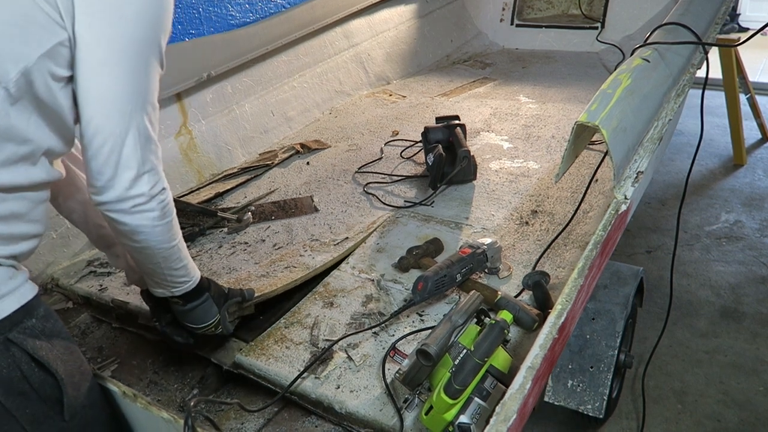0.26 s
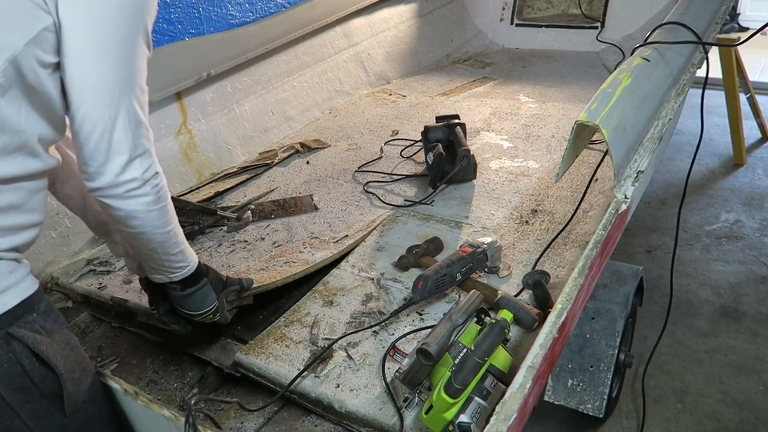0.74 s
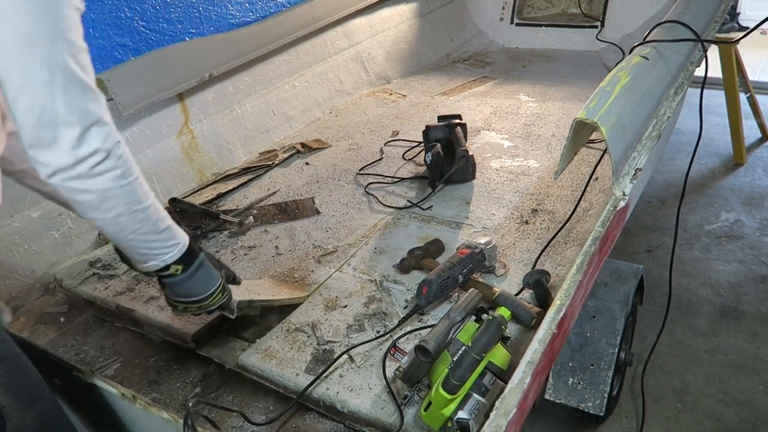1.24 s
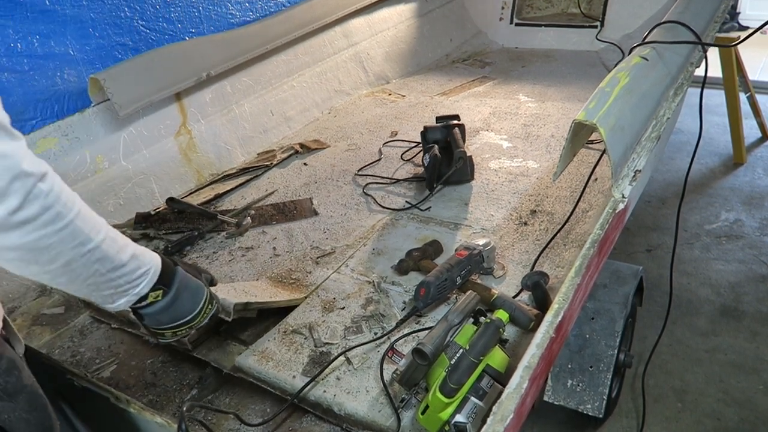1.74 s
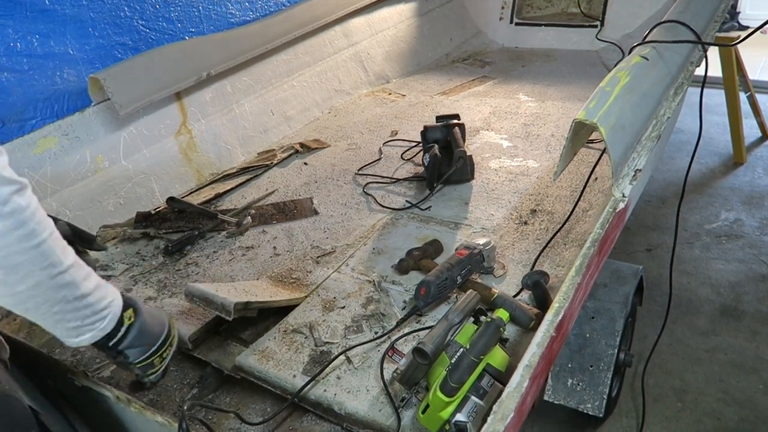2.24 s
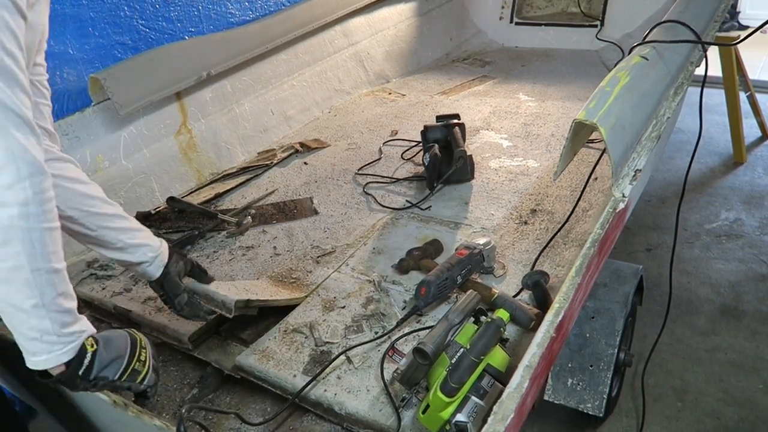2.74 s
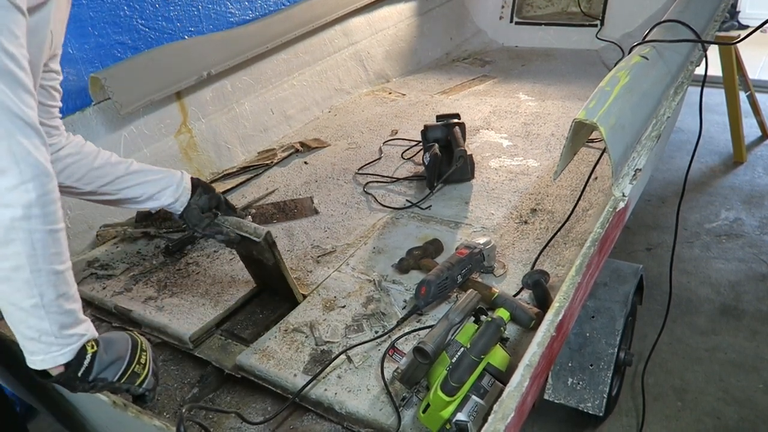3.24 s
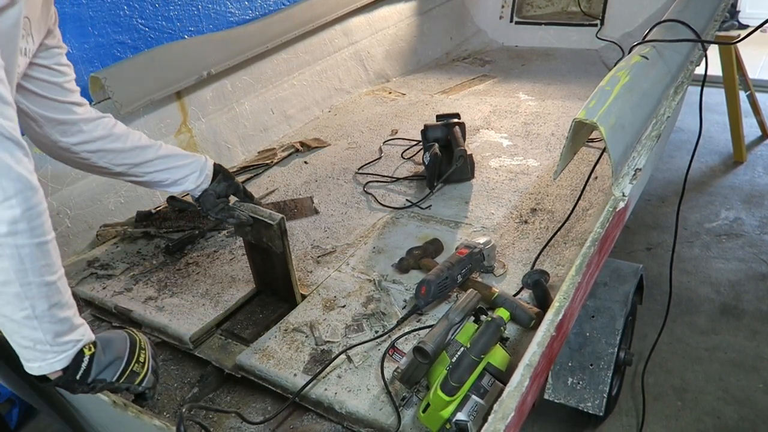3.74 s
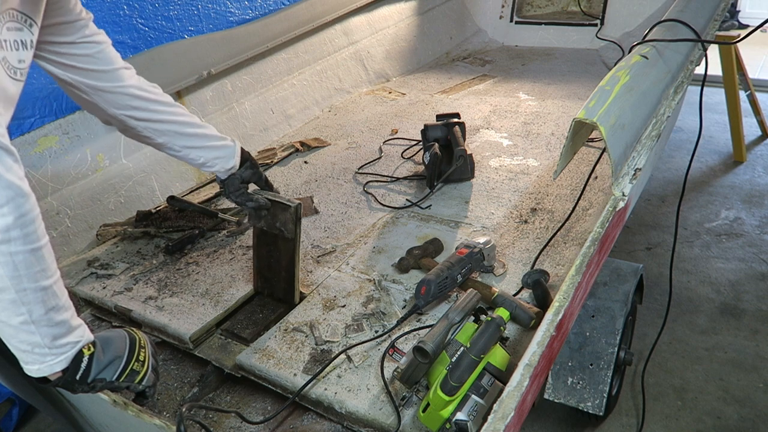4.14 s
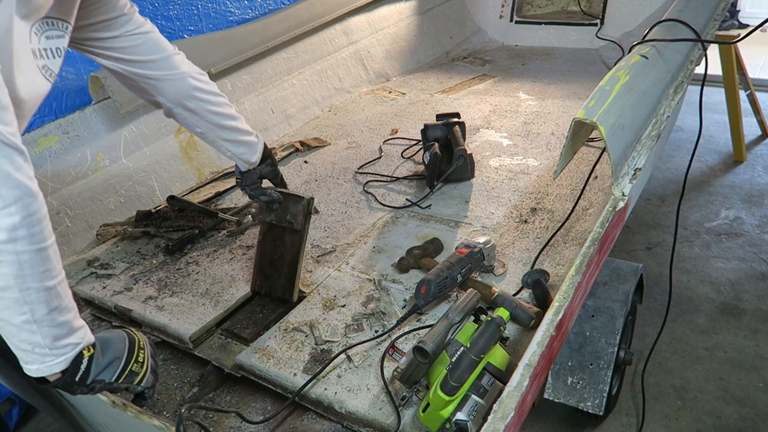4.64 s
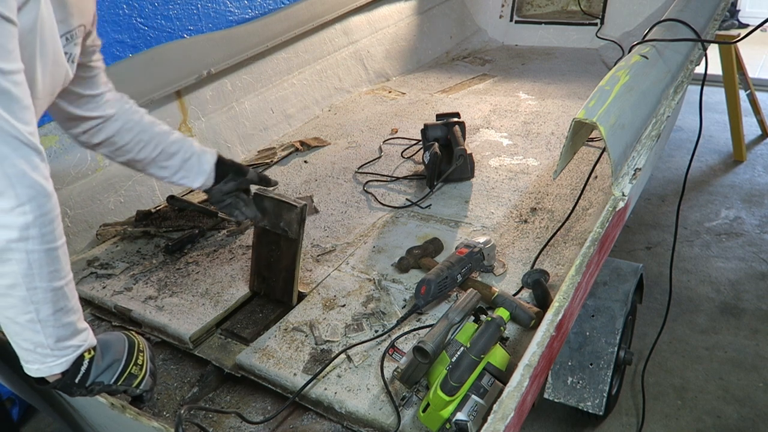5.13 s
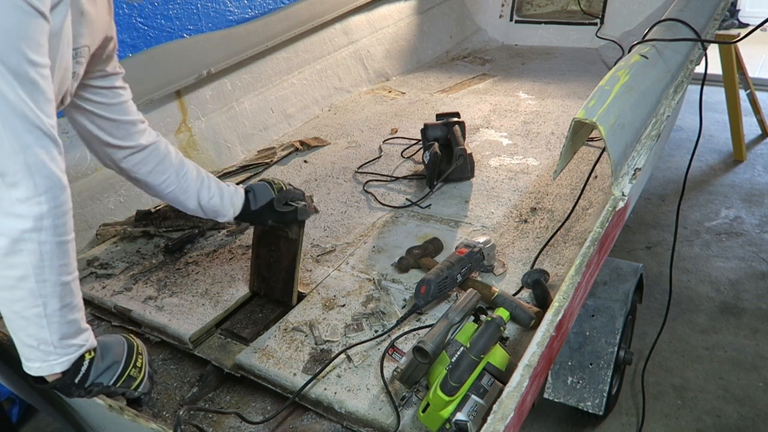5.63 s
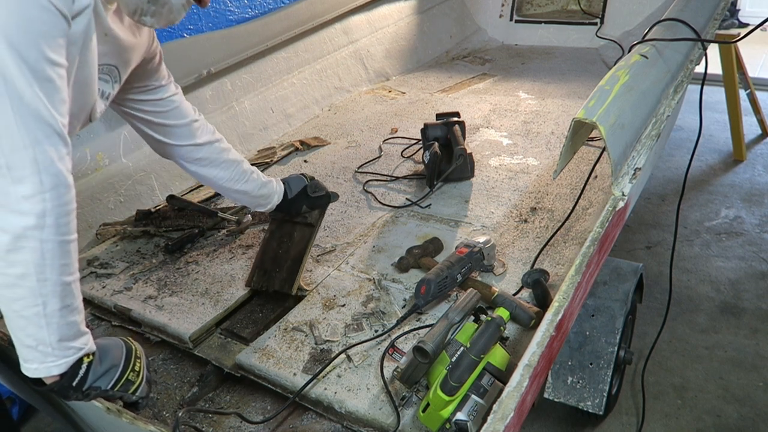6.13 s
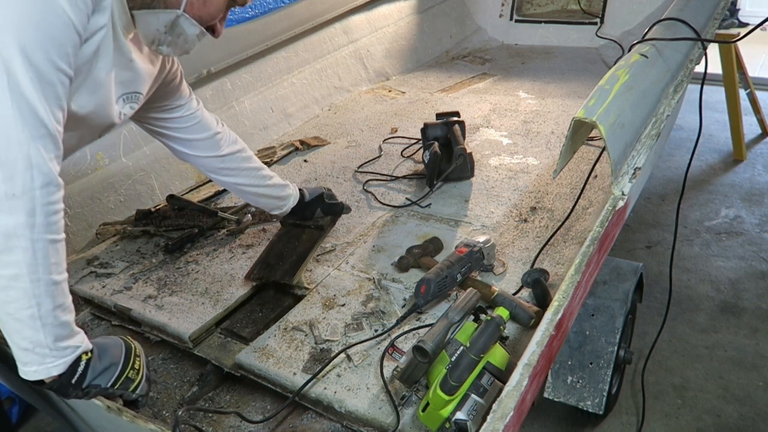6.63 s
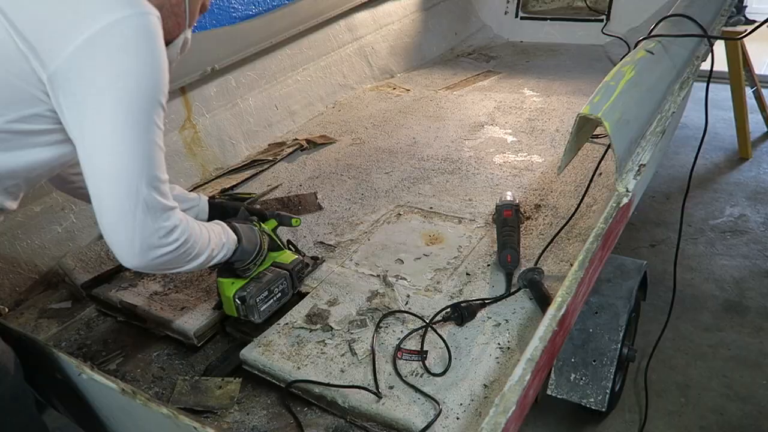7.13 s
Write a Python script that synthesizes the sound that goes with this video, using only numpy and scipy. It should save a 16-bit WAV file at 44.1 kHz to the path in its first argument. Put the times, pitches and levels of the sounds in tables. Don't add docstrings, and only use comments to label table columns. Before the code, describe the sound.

Close stereo pickup of old wood being prised up: a violent first burst of about a second, overloading at the hardest breaks, then near silence with low hum and soft glove brushes. Crackling resumes with knocks, squeaks and groaning wood, turns thinner and drier for the last strip, and cuts suddenly to a rumbling motor starting up.

```python
import sys
import numpy as np
from scipy import signal
from scipy.fft import rfft, irfft, next_fast_len
from scipy.io import wavfile
from scipy.ndimage import uniform_filter1d, map_coordinates

SR = 44100
rng = np.random.default_rng(int(sys.argv[2]) if len(sys.argv) > 2 else 0)


def ratio_of_db(decibels):
    return 10 ** (np.asarray(decibels, float) / 20)


def put_to_file(sound):
    columns = np.atleast_2d(sound).T
    safe = np.clip(columns, -1, 1)
    whole_steps = np.round(safe * 32767)
    wavfile.write(sys.argv[1], SR, whole_steps.astype(np.int16))


N = 325458
T = np.arange(N) / SR

FIRST_PULL_END_S, GRIP_S, LAST_PULL_S, SCENE_CHANGE_S = 2, 3.069, 5.9, 7.187

# start in seconds, hold in ms, strain in dB, swell in ms, fine dust over crackle in dB.
RIPS_BOARD = [
    (.203, 33, -22, 83, -8),
    (.47, 150, -28.5, 54, -7),
    (.623, 120, -26.5, 6, -12.5),
    (.86, 5, -21.5, 31, -12),
    (.91, 5, -13.5, 30, -18.5),
    (.974, 5, -18, 35, -28),
]
RIPS_PLANK = [(3.094, 110, -29.5, 12, -7), (3.274, 28, -26.5, 6, -5), (3.38, 190, -38.5, 50, -2),
              (3.688, 25, -30, 10, -6), (3.77, 190, -31.5, 60, -4.5), (3.98, 103, -21.5, 110, -6.5),
              (4.143, 28, -23, 12, -2), (4.416, 21, -24, 1700, -3), (4.621, 18, -27.5, 2600, -3.5),
              (4.733, 140, -26.5, 110, -3), (4.886, 25, -17.5, 120, -4), (4.931, 110, -25.5, 30, -6),
              (5.176, 75, -21, 16, -12), (5.25, 35, -26, 210, -4.5)]
RIPS_STRIP = [
    (5.5, 360, -51.5, 50, -4.5),
    (5.972, 30, -27.5, 107, -12),
    (6.024, 51, -23, 76, -3.5),
    (6.247, 8.5, -19.5, 350, -3),
    (6.352, 18, -26.5, 140, 4.5),
    (6.431, 6.9, -20.5, 5, -4),
    (6.684, 155, -37, 110, -0.5),
    (6.845, 6.2, -19.5, 8, -2.5),
    (6.905, 160, -31, 50, -1),
    (7.087, 80, -26, 50, -6.5),
]
# start in seconds, hold in ms, level in dB, swell in ms.
GROANS = [(0, 26, -51.5, 10), (0.211, 51, -24, 96), (.32, 12, -13.5, 10), (.61, 11.5, -29.5, 620),
          (.623, 4.4, -16.5, 5.7), (.86, 8.3, -15, 15), (.91, 5, -14, 34), (.974, 5, -16.5, 20),
          (1.4, 220, -50.5, 490), (3.132, 98, -32, 86), (3.275, 150, -29.5, 10), (3.698, 260, -32.5, 170),
          (3.982, 98, -15.5, 31), (4.152, 37, -21, 60), (4.416, 31, -20.5, 1300), (4.622, 17, -20.5, 290),
          (4.844, 130, -22, 290), (5.175, 85, -23.5, 12), (5.864, 60, -39, 610), (5.972, 5.3, -27.5, 130),
          (6.024, 43, -25, 65), (6.248, 91, -24, 620), (6.46, 16, -23, 60), (6.684, 9.6, -33.5, 22),
          (6.861, 43, -26, 36), (7.087, 6.8, -27, 46)]
# start in seconds, hold in ms, level in dB, swell in ms.
BOOMS = [(0, 150, -43, 11), (.296, 30, -25.5, 170), (.424, 20, -21.5, 240), (.62, 30, -35.5, 600),
         (.91, 60, -28, 85), (1.006, 55, -22.5, 145), (3.1, 170, -53, 21.2), (3.38, 60, -38, 490),
         (4.152, 20, -48, 430), (4.25, 550, -40.5, 200), (4.886, 230, -41, 150), (5.262, 37, -34.5, 170),
         (5.99, 44, -31, 480), (6.2, 350, -43, 50), (6.9, 280, -59, 300)]
# start in seconds, hold in ms, level in dB, swell in ms.
RUSTLES = [
    (2.158, 40, -64, 170),
    (2.682, 40, -63, 200),
    (2.8, 250, -72, 100),
    (3.076, 15, -46, 12),
    (1.56, 30, -66, 200),
]
SAG_DB_S, SWELL_DB = 14, 27
# first drop in dB, at dB per s, then dB per s.
FIBRE_RELEASE, WOOD_RELEASE = (7.6, 250, 86), (45, 230, 120)
HULL_RELEASE, CLOTH_RELEASE = (13, 180, 32), (18, 240, 150)

# start in seconds, peak in dB, splinter ring in dB, fine dust in dB, pitch in Hz.
SNAPS_BOARD = [(0.1302, -24, -16, -11, 2190), (0.146, -22.5, -4, -9.5, 2397),
               (0.2003, -5.5, -3.5, -13.5, 2565), (0.314, -16.5, 2, -33, 1050),
               (0.3267, -16, 2.5, -33.5, 1248), (0.4428, -17.5, -8, -12, 1648),
               (0.4548, -6.5, -3.5, -33.5, 1508), (0.486, -15, -3, -16.5, 1254),
               (0.5166, -16, -5, -9, 1667), (0.6212, 17, -23.5, -29, 1750),
               (0.843, -18.5, -2.5, -9.5, 2390), (0.851, -8.5, -3, -17.5, 1676),
               (0.9042, -5.5, -8.5, -18, 3150), (0.9606, -3, -7, -16, 3140), (0.9705, 16, -30, -31, 2496),
               (1.193, -32, 4.5, -24, 1243), (1.7243, -52.5, -11, -12.5, 1875),
               (1.8805, -52.5, -14, -16.5, 2630)]
SNAPS_PLANK = [
    (3.0716, -39.5, -17, -19.5, 1880),
    (3.0927, -20, -7, -14.5, 3040),
    (3.1574, -19, -20, -28.5, 1730),
    (3.2748, -30, -22, -22.5, 5870),
    (3.3503, -27.5, 5, -4, 2640),
    (3.4561, -19.5, -13, -29.5, 1770),
    (3.5365, -18.5, -33, -12.5, 2477),
    (3.6385, -25.5, -4, -7.5, 1390),
    (3.688, -22, 4.5, -11, 4064),
    (3.798, -17.5, -6, -13, 1405),
               (3.973, -10, -6, -15, 2360), (4.018, -11.5, 0, -4.5, 3300),
                (4.0665, -11.5, -1.5, -14, 3600), (4.139, -14.5, 0, -3, 1660),
                (4.2462, -18, -15.5, -5.5, 2660), (4.308, -4.5, -6, -14.5, 2750),
                (4.399, -9, -21, -4.5, 2153), (4.7077, -22, -22, 0.2, 2400), (4.7548, -14, -10, -14, 1504),
                (4.8785, -8.5, 0.5, -7.5, 2780), (4.8996, -12.5, -14.5, -8, 2920),
                (5.173, -5, -5, -20.5, 4470), (5.1993, 1.5, -24.5, -27.5, 2815),
                (5.2468, -14, -2, -18, 2090)]
SNAPS_STRIP = [(5.573, -46.5, 6, -0.5, 4900), (5.7106, -25, -19, -18.5, 1910),
               (5.881, -39.5, 1, -3.5, 1380), (5.9323, -32, 9, -27, 1390), (5.9577, -19.5, 0.5, -11, 2940),
               (6.021, -13.5, -1, -10.5, 1904), (6.06, -15, -7, -8, 2252), (6.1811, -16.5, -15, 0.5, 5700),
               (6.2399, -7, 0.5, -15.5, 2033), (6.341, -13.5, 7, 1.5, 5600), (6.4314, 3.5, 0, -14.5, 2090),
               (6.447, -11.5, 4, -20, 2913), (6.6557, -26.5, -1, -9, 1820), (6.699, -27, -19, -2, 3290),
               (6.844, -17, 11.5, 1, 2823), (6.9653, -22.5, -1, -1, 2880), (7.08, -17.5, 4, 4.5, 2090),
               (7.1305, -12.5, 4, -2.5, 2090)]
VOLLEY_S = 0.091
CLEAN_DB, CLEAN_SHORTENS = -13, 0.28

# start in seconds, peak in dB, t60 in ms.
THUDS = [
    (0.317, -11, 97),
    (0.326, -6, 70),
    (3.976, -14.5, 120),
    (4.147, -17.5, 210),
    (4.312, -9, 210),
    (5.961, -21, 130),
]

# start in seconds, length in ms, level in dB, pitch in Hz, width in Hz.
SQUEAKS = [(0.317, 36, -37, 1870, 1090), (.455, 34, -24.5, 1320, 509.5), (.457, 35, -32, 2284, 890),
           (0.511, 30, -32, 1609, 400), (0.501, 110, -40, 3863, 1193), (.853, 27, -32.5, 2937, 300),
           (0.903, 30, -26, 2940, 250), (.972, 16, -14, 2796, 912), (2.119, 146, -73, 2500, 701.6),
           (2.81, 21, -72.5, 3600, 200), (2.815, 25, -71, 1800, 201.3), (3.275, 90, -38.5, 970, 252),
           (3.3, 300, -45, 674, 79.4), (3.535, 55, -40, 3800, 1500), (3.537, 47, -40, 790, 400),
           (3.685, 37, -37, 3660, 500), (3.69, 220, -40, 671, 122), (3.772, 36, -38, 1500, 900),
           (4.031, 130, -33, 3257, 400), (4.313, 50, -29, 2520, 500), (4.375, 74, -27.5, 2050, 402),
           (4.545, 58, -31, 1960, 900), (4.61, 43, -35, 2470, 910), (4.759, 35, -31, 1490, 300),
           (4.88, 66, -29.5, 2773, 350), (4.882, 40, -25.5, 4420, 900), (5.176, 150, -36, 3776, 500),
           (5.715, 43, -50, 1760, 200), (6.152, 126, -31, 1950, 510), (6.182, 63, -39.5, 5610, 400),
           (6.31, 30, -32.5, 3325, 500), (6.341, 50, -27, 5580, 348), (6.432, 60, -25.5, 2807, 600),
           (6.44, 160, -35.5, 2307, 300), (6.6, 70, -55.5, 2200, 200), (6.795, 55, -44, 3230, 600),
           (6.845, 50, -30, 5070, 700), (6.98, 30, -33.5, 3160, 302), (7.082, 90, -39, 4317, 200.4),
           (7.083, 93, -29.5, 2090, 130)]
# start in seconds, length in ms, level in dB, pitch in Hz, width in Hz.
RUMBLES = [(0.201, 140, -36, 140.7, 110), (0.327, 68, -21.5, 248.2, 110), (0.339, 140, -33, 139.2, 71),
           (.558, 83, -30, 240.7, 140), (.865, 40, -32.5, 244, 89), (.972, 14.3, -6.5, 556, 330),
           (1.0, 18, -25.5, 328, 230), (1.039, 6.7, -17.5, 230, 200), (1.05, 64, -27, 301.4, 160),
           (1.13, 23, -33, 202.7, 110), (1.2, 63, -34.5, 176, 310), (4.53, 57, -35.5, 393, 240),
           (4.61, 76, -39.5, 397, 160), (5.198, 37, -20.5, 372, 140), (5.245, 14, -24, 381.4, 160),
           (5.27, 73, -36.5, 375, 190), (6.67, 29, -40, 600, 500), (0.625, 21, -22, 399.7, 170),
           (5.9, 55, -34, 217, 74), (5.95, 49, -27, 65, 7.9), (5.95, 30, -34.5, 402, 50),
           (5.96, 61, -34, 172.4, 18), (6.05, 60, -30, 245, 67), (6.17, 42, -32, 216.6, 57),
           (7.19, 60, -34, 65, 30)]
# start in seconds, length in ms, level in dB, pitch in Hz, width in Hz.
SCRAPES = [
    (.971, 14, -21, 4300, 1100),
    (1.1, 25, -28.5, 2400, 1200),
    (5.198, 22, -23, 2900, 1900),
    (1.74, 100, -63.5, 230, 61),
    (.622, 12, -16.5, 3900, 1500),
    (2.83, 150, -64, 235, 110),
]
RUB_FADE_DB, RUB_EDGE_S = 12, 0.0048

# start in seconds, peak in dB.
TICKS = [(0.0002, -43), (0.6229, -7), (0.631, -4), (0.8438, -21), (0.9726, -5.5), (1.4662, -57),
         (1.494, -52), (1.6507, -64.5), (1.7244, -61.0), (2.3614, -71.0), (2.6782, -56.5), (3.4602, -27.5),
         (3.6655, -21), (3.7702, -20), (4.1426, -12), (4.401, -1.5), (4.7104, -20), (4.8796, -8.5),
         (5.0632, -20.5), (5.1754, -13.5), (5.1988, -5), (5.5749, -41), (5.7091, -35), (5.8292, -40),
         (5.8821, -43), (5.958, -20), (6.1827, -12), (6.3416, -7.0), (6.4333, -1.5), (6.6574, -28.5),
         (6.7008, -22), (6.8458, -10.5), (7.0802, -14), (7.1311, -7), (7.2212, -47.0), (7.3792, -42.0),
         (1.19, -43), (4.874, -16.5), (4.9006, -11.5), (6.2424, -13), (6.429, -14.5), (6.516, -30),
               (6.795, -33), (6.981, -21.5), (5.2037, -6)]
# start in seconds, peak in dB.
FLAKES = [(0.5852, -19.5), (3.2715, -22), (3.3348, -23), (3.3537, -18), (3.6835, -25.5), (3.7963, -18),
          (3.8494, -23), (3.8763, -25.5), (3.92, -21), (3.9594, -17.5), (4.8502, -16), (5.2246, -19.5),
          (7.0365, -19)]
TICK_T60_S, TICK_DB = .004, -4
CRUMBLE, CRUMBLE_T60_S = .35, .05

# frequency in Hz, level in dB per Hz.
CRACKLE = [(410, -26.5), (700, -5), (1000, 0), (2100, 0.5), (2850, 0.5), (3860, -4.5), (5580, -13),
           (7800, -28.5), (13200, -120)]
# frequency in Hz, level in dB per Hz.
DUST = [(2350, -16.5), (4000, -2), (6040, 2), (11800, -1.5), (13100, -4.5), (14000, -10.5), (15700, -20.5)]
# frequency in Hz, width in Hz, level in dB.
BOARD = [(191, 73, 2.5), (456, 140, 5), (887, 160, 1.5), (1620, 660, -17)]
# frequency in Hz, width in Hz, level in dB.
PLANK = [(166, 55, -3.5), (216.5, 23, 7.5), (252.6, 21, 8.5), (353.9, 30, 4.5), (402, 22, 8.5),
         (570, 62, 5), (730, 270, -7)]
# frequency in Hz, width in Hz, level in dB.
STRIP = [(2090, 120, -16), (2780, 79, 0.5), (5370, 340, -14.5)]
# frequency in Hz, width in Hz, amount taken away in dB.
HOLLOW = [(1150, 1300, -8)]
# frequency in Hz, width in Hz, level in dB.
HULL = [(47, 13, -10), (65, 19, -2), (116.3, 27, -4.5)]

# start in seconds, hold in ms, level in dB, swell in ms.
KICK = (7.2, 90, -33, 14)
# start in seconds, hold in ms, level in dB, swell in ms.
SPIN_UP = (7.332, 50, -38, 380)
# frequency in Hz, level in dB per Hz.
WHIRR = [(18, -37), (30, -17), (102, -15), (253, -32), (497, -17.5), (1000, -19), (1170, -17.5),
         (2130, -18.5), (11900, -48.5), (15000, -86.5)]

# frequency in Hz, level in dB rms.
HUM = [(53.8, -76), (100.2, -62), (200.2, -70), (608.3, -80.5), (2821, -91.5), (3505, -89), (7009, -95)]
HUM_WAVER_DB = 1.5
# frequency in Hz, level in dB per Hz.
AIR = [(15, -52), (25, -19), (45, -4), (90, -8.5), (140, -13.5), (208, -10.5), (569, -17.5), (7220, -42),
       (14000, -58.5)]
# time in seconds, level in dB.
ROOM_GAIN = [(0, -38), (.6, -44.5), (1, -50.5), (1.9, -62.5), (2.8, -56), (4.2, -50.5), (5.2, -52.5),
             (5.9, -41.5), (6.5, -56.5), (7.18, -48.5), (7.38, -37)]

# frequency in Hz, t60 in seconds.
SHOP = [(100, 1), (300, 0.48), (1000, 0.5), (3000, 0.24), (10000, 0.085)]
# frequency in Hz, t60 in seconds.
PORTS = [(100, .08), (1000, .04), (10000, 0.23)]
# frequency in Hz, side minus mid in dB.
WIDTH = [(60, -55), (170, -38), (300, -18), (1300, -15), (3300, -19), (4800, -10), (8100, -6), (15000, -3)]
# frequency in Hz, side minus mid in dB.
AIR_WIDTH = [(60, -50), (120, -34), (230, -12), (400, -3), (2400, -8), (8000, -2), (15000, 1)]
# frequency in Hz, lead in radians.
LEAD = [(4200, 0), (8400, .5), (11000, 1.1), (15000, 1.3)]


def unit(x):
    return x / np.sqrt(np.mean(x ** 2) + 1e-20)


def along(points, hz):
    f, v = np.transpose(points)
    return np.interp(np.log(hz + 1), np.log(f + 1), v)


def wobble(rate):
    coarse = T[::64]
    knots = rng.standard_normal(int(N * rate / SR) + 4)
    return np.interp(T, coarse, map_coordinates(knots, [coarse * rate]))


def filtered(x, response):
    m = next_fast_len(N + SR // 2)
    return irfft(rfft(x, m) * response(np.fft.rfftfreq(m, 1 / SR)), m)[..., :N]


def modes(table):
    def response(f):
        total = 0
        for k, (hz, width, db) in enumerate(table):
            damping = 1j * f * width
            total = total + (-1) ** k * ratio_of_db(db) * damping / (hz * hz - f * f + damping)
        return total
    return response


def colour(points):
    return lambda f: ratio_of_db(along(points, f))


def grit(spread_db, clump_db, clump_rate):
    sizes = np.minimum(rng.exponential(size=N), 6)
    return rng.standard_normal(N) * ratio_of_db(spread_db * sizes + clump_db * wobble(clump_rate))


def effort(s, hold_ms, db, swell_ms, release):
    drop_db, quick, slow = release
    hold, swell = hold_ms / 1000, swell_ms / 1000 + .001
    tired_db = db - SAG_DB_S * hold
    let_go_db = tired_db - drop_db
    times = np.cumsum([s - swell, swell, hold, drop_db / quick, 100 / slow])
    return np.interp(T[::64], times, [db - SWELL_DB, db, tired_db, let_go_db, let_go_db - 100], left=-150)


def efforts(rows, release):
    return np.array([effort(*row[:4], release) for row in rows])


def strongest(levels_db):
    return np.interp(T, T[::64], np.max(levels_db, axis=0))


def patchy(x, depth_db):
    z = signal.stft(x, nperseg=256)[2]
    field = uniform_filter1d(rng.standard_normal(z.shape), size=3, axis=0)
    field = uniform_filter1d(field, size=12, axis=1)
    return unit(signal.istft(z * ratio_of_db(depth_db * unit(field)), nperseg=256)[1][:N])


def wooden(x, board_db):
    board = filtered(x * (T < FIRST_PULL_END_S), modes(BOARD))
    plank = filtered(x * (T >= FIRST_PULL_END_S), modes(PLANK))
    return ratio_of_db(board_db) * board + plank


def ripping():
    rips = RIPS_BOARD + RIPS_PLANK + RIPS_STRIP
    strain_db = efforts(rips, FIBRE_RELEASE)
    crackle_db = strongest(strain_db)
    dust_db = strongest(strain_db + np.array(rips)[:, 4:])
    slips = unit(grit(spread_db=2.6, clump_db=2.8, clump_rate=50))
    powder = unit(grit(spread_db=2.6, clump_db=1.9, clump_rate=90))
    crackle = ratio_of_db(crackle_db - 3.5) * patchy(filtered(slips, colour(CRACKLE)), depth_db=3.2)
    dust = ratio_of_db(dust_db - 3.5) * unit(filtered(slips + powder, colour(DUST)))
    return crackle + dust


def groaning():
    level_db = strongest(efforts(GROANS, WOOD_RELEASE))
    creaks = grit(spread_db=3.4, clump_db=1.4, clump_rate=60)
    return ratio_of_db(level_db - 5.5) * unit(wooden(creaks, board_db=-0.5))


def booming():
    level_db = strongest(efforts(BOOMS, HULL_RELEASE))
    shifts = grit(spread_db=5.3, clump_db=0.6, clump_rate=31)
    return ratio_of_db(level_db - 6.0) * unit(filtered(shifts, lambda f: modes(HULL)(f) ** 2))


def rustling():
    level_db = strongest(efforts(RUSTLES, CLOTH_RELEASE))
    cloth = lambda f: colour(CRACKLE)(f) + ratio_of_db(-17.5) * colour(DUST)(f)
    return ratio_of_db(level_db) * unit(filtered(grit(spread_db=1.1, clump_db=1.3, clump_rate=60), cloth))


def tearing():
    regrip = np.clip((T - GRIP_S) / 0.023, 0, 1) ** 2
    gripped = np.maximum(T < FIRST_PULL_END_S, regrip)
    return (ripping() + groaning()) * gripped + booming() + rustling()


def snaps():
    crack, fine, knock = np.zeros((3, N + SR))
    t = np.arange(SR // 9) / SR
    treble_fade = 0.86 * ratio_of_db(-60 * t / .2) + .3 * ratio_of_db(-60 * t / 0.0019)
    for s, db, ring_db, fine_db, hz in SNAPS_BOARD + SNAPS_PLANK + SNAPS_STRIP:
        fibres = rng.standard_normal((2, len(t))) * ratio_of_db(2.3 * rng.exponential(size=len(t)))
        t60 = VOLLEY_S * ratio_of_db(-CLEAN_SHORTENS * max(db - CLEAN_DB, 0))
        fade = ratio_of_db(-60 * t / t60) * (1 - np.exp(-t / (0.008 * t60)))
        fade += 0.028 / np.sqrt(t60) * ratio_of_db(-60 * t / 0.0014)
        volley = fade * fibres
        loudness = np.sqrt(np.mean(volley ** 2, 1) / np.mean(fade ** 2))
        volley = ratio_of_db(db - 14.5) * volley / loudness[:, None]
        cycles = 14 * ratio_of_db(0.4 * ring_db)
        ring = ratio_of_db(-60 * t[:900] * hz / cycles) * np.sin(2 * np.pi * hz * t[:900])
        splinter = signal.oaconvolve(volley[0], ring / np.linalg.norm(ring))[:len(t)]
        here = slice(round(s * SR), round(s * SR) + len(t))
        crack[here] += volley[0] + ratio_of_db(ring_db) * splinter
        fine[here] += ratio_of_db(fine_db) * volley[1] * treble_fade
        knock[here] += volley[1]
    crack = ratio_of_db(6.5) * filtered(crack[:N], colour(CRACKLE))
    fine = ratio_of_db(19.0) * filtered(fine[:N], colour(DUST))
    return crack + fine + ratio_of_db(6.0) * wooden(knock[:N], board_db=-0.5)


def thuds():
    blows, t = np.zeros(N + SR), np.arange(SR // 4) / SR
    for s, db, t60_ms in THUDS:
        fade = ratio_of_db(-60000 * t / t60_ms) + 2.8 * ratio_of_db(-60 * t / 0.025)
        blows[round(s * SR):][:len(t)] += ratio_of_db(db) * fade * rng.standard_normal(len(t))
    return wooden(blows[:N], board_db=-1.0)


def rubbing():
    out = np.zeros(N + SR)
    t = T[:SR // 2]
    for s, length_ms, db, hz, width_hz in SQUEAKS + RUMBLES + SCRAPES:
        length = length_ms / 1000
        slips = rng.standard_normal(len(t)) * ratio_of_db(2.9 * rng.exponential(size=len(t)))
        edge = np.clip(np.minimum(t, length - t) / RUB_EDGE_S, 0, 1)
        rub = slips * edge * ratio_of_db(-RUB_FADE_DB * t / length)
        peak = signal.iirpeak(hz, hz / (1.5 * width_hz + 9), SR)
        ring = signal.lfilter(*peak, signal.lfilter(*peak, rub))
        out[round(s * SR):][:len(t)] += ratio_of_db(db) * ring / np.sqrt(np.sum(ring ** 2) / (length * SR))
    return out[:N]


def clicks(rows, t, crumbs):
    track = np.zeros(N + SR)
    fade = ratio_of_db(-60 * t / TICK_T60_S) + crumbs * ratio_of_db(-60 * t / CRUMBLE_T60_S)
    for s, db in rows:
        burst = fade * rng.standard_normal(len(t))
        burst *= ratio_of_db(db + TICK_DB) / np.sqrt(np.mean(burst[:30] ** 2))
        track[round((s - .0003) * SR) + 9:][:len(t)] += burst
    return track[:N]


def ticks():
    fibres = clicks(TICKS, T[:256], crumbs=0)
    flakes = clicks(FLAKES, T[:2048], crumbs=CRUMBLE)
    return filtered(fibres + flakes, colour(DUST)) + ratio_of_db(-1.0) * filtered(fibres, colour(CRACKLE))


def saw():
    rumble_db = strongest(efforts([KICK], HULL_RELEASE))
    whirr_db = strongest(efforts([SPIN_UP], HULL_RELEASE))
    motor = filtered(grit(spread_db=3.5, clump_db=-1.5, clump_rate=32), colour(WHIRR))
    rumble = filtered(motor, lambda f: 1 / (1 + (f / 400) ** 4))
    whirr = motor - rumble
    return (ratio_of_db(rumble_db) * unit(rumble) + ratio_of_db(whirr_db - 3.5) * unit(whirr)) * (T > SCENE_CHANGE_S)


def echoes(x, decay, hop, size):
    starts = range(0, N, hop)
    hz, t, z = signal.stft(rng.standard_normal((len(starts), size)), SR, nperseg=128)
    tails = signal.istft(z * ratio_of_db(-60 * t / along(decay, hz)[:, None]), SR, nperseg=128)[1]
    wet = np.zeros(N + 2 * SR)
    for start, tail in zip(starts, tails):
        answer = signal.fftconvolve(x[start:start + hop], tail / np.linalg.norm(tail))
        wet[start:][:len(answer)] += answer
    return wet[:N]


def background():
    lines = np.zeros(N)
    for hz, db in HUM:
        drift = 1 + 0.003 * wobble(2.4) + 0.004 * wobble(150)
        tone = np.sin(2 * np.pi * np.cumsum(hz * drift) / SR)
        sounding = (T < SCENE_CHANGE_S) | (hz < 1000)
        lines += ratio_of_db(db + 5.0 + HUM_WAVER_DB * wobble(33)) * tone * sounding
    air = unit(filtered(rng.standard_normal(N), colour(AIR)))
    air = ratio_of_db(-63.0 + 1.3 * wobble(10.0)) * air
    gain_db = np.interp(T, *np.transpose(ROOM_GAIN))
    return ratio_of_db(gain_db + 58.0) * (lines + air)


def scene():
    wood = tearing() + snaps() + thuds() + rubbing() + ticks()
    thin = lambda f: 1.4 * modes(STRIP)(f) - modes(HOLLOW)(f)
    wood = wood + filtered(wood * (T > LAST_PULL_S), thin)
    shop = np.pad(echoes(wood, SHOP, SR // 2, size=24000), (250, 0))[:N]
    wood = (wood + ratio_of_db(-10.5) * shop) * (T < SCENE_CHANGE_S)
    motor, far = saw(), background()
    near = wood + motor
    scatter = echoes(wood, PORTS, SR // 20, size=2048) * (T < SCENE_CHANGE_S)
    side = filtered(scatter + np.roll(motor, SR // 50), colour(WIDTH))
    side += filtered(np.roll(far, SR // 20), colour(AIR_WIDTH))
    span = lambda f: f / (f + 15) / (1 + (f / 2600) ** 2)
    board = echoes(near * (T < FIRST_PULL_END_S), PORTS, SR // 10, size=2048)
    side += ratio_of_db(-9) * filtered(board, span)
    pair = np.array([near + far + side, near + far - side])
    return filtered(pair, lambda f: np.exp(.5j * along(LEAD, f) * [[1], [-1]]))


def roll_off(x):
    return signal.sosfilt(signal.butter(12, 15820, fs=SR, output="sos"), x)


def record(dry):
    camera = lambda hz: (hz < 15800) * (1 - .85 / (1 + ((hz - 13000) / 110) ** 2))
    heard = filtered(dry, camera)
    overloaded = heard / (1 + np.abs(heard / 1.05) ** 8) ** (1 / 8)
    return roll_off(overloaded)


dry = scene()
out = record(dry)
put_to_file(out)
```